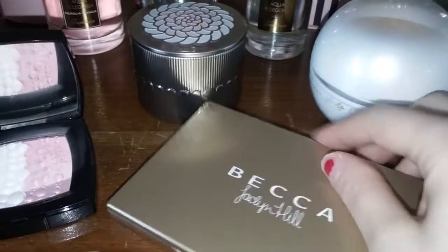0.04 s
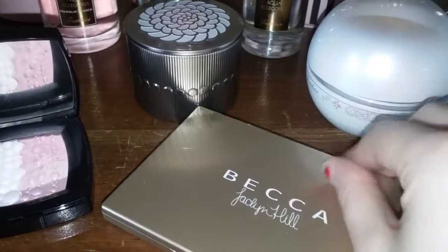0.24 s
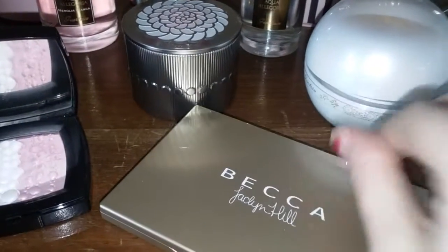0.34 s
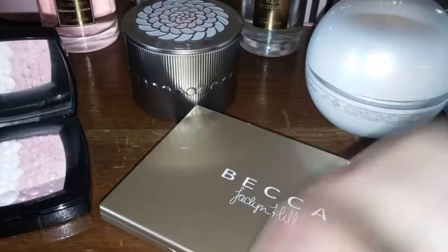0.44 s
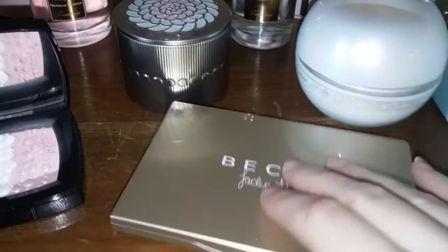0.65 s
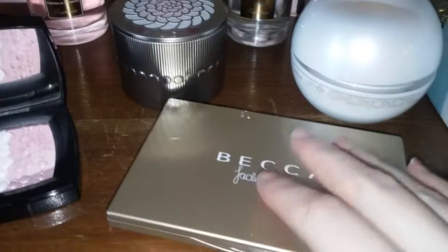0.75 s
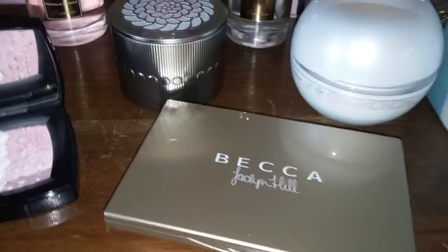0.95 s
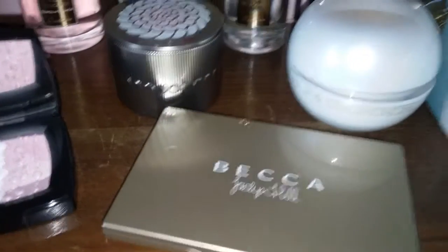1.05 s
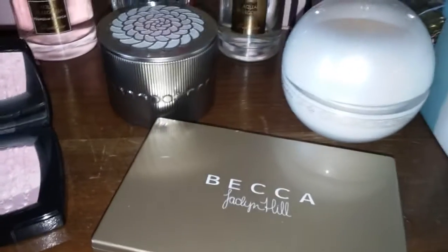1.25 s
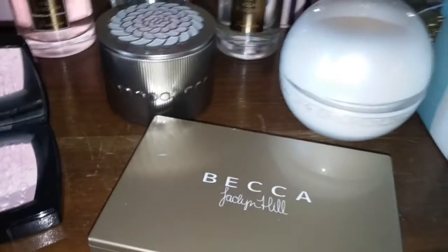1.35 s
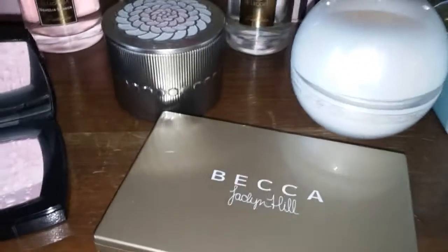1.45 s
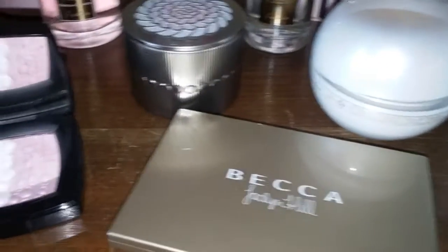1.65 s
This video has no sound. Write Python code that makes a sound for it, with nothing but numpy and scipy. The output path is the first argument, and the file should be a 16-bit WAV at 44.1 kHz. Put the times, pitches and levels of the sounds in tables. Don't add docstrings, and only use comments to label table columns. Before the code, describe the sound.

A plastic compact on a wooden table, heard close in a small quiet room with low rumble, soft hush and hiss. Faint bumps at first, then at 0.24 s a loud hard snap and rapid clatter until about 0.29 s, with short room echo. From 0.57 to 0.76 s, much quieter sliding rub and soft taps. A faint rub near 1.0 s, slight nudges at 1.28 and 1.6 s.

```python
import sys
import numpy as np
from scipy import signal
from scipy.fft import rfft, irfft
from scipy.io import wavfile

SR = 44100
rng = np.random.default_rng(int(sys.argv[2]) if len(sys.argv) > 2 else 0)


def bounce(signal):
    frames = np.transpose(np.atleast_2d(signal))
    limited = np.clip(frames, -1, 1)
    pcm = np.round(limited * 32767).astype(np.int16)
    wavfile.write(sys.argv[1], SR, pcm)


def makeup_ratio(level_db):
    decades = np.asarray(level_db, float) / 20
    return 10 ** decades


N = 74970


def at_hz(spectrum, hz):
    pitch_hz, level_db = np.transpose(spectrum)
    return np.interp(np.log(hz + 1), np.log(pitch_hz), level_db, left=-200, right=-200)


def colour(x, spectrum):
    gain = makeup_ratio(at_hz(spectrum, np.fft.rfftfreq(N, 1 / SR)))
    return irfft(rfft(x) * gain, N)


def bandpass(x, order, edges_hz):
    return signal.sosfilt(signal.butter(order, edges_hz, "band", fs=SR, output="sos"), x)


def rms_one(x):
    return x / np.sqrt(np.mean(x ** 2) + 1e-20)


def drift(rate):
    r = np.exp(-80 * np.pi * rate / SR)
    noise = rng.standard_normal(N // 40 + 2002)
    slow = signal.lfilter([1], [1, -2 * r, r * r], noise)[2000:]
    return np.interp(np.arange(N) / 40, np.arange(len(slow)), rms_one(slow))


def ring(x, hz, t60):
    r = makeup_ratio(-60 / (max(t60, 1e-3) * SR))
    w = 2 * np.pi * hz / SR
    return signal.lfilter([0, np.sin(w)], [1, -2 * r * np.cos(w), r * r], x + 1e-18)


def hush(spectrum, patchy_db, fast):
    hz = np.fft.rfftfreq(N, 1 / SR)
    noise = rfft(rng.standard_normal(N)) * makeup_ratio(at_hz(spectrum, hz))
    together = drift(8.85)
    out = 0
    for centre in 30 * 2 ** np.arange(0, 9.6, .5):
        share = np.clip(1 - abs(2 * np.log2((hz + 1) / centre)), 0, 1)
        flicker = makeup_ratio(patchy_db * (0.241 * together + drift(fast)))
        out = out + irfft(noise * share, N) * flicker
    return rms_one(out)


# pitch_hz [Hz], width_hz [Hz], level_db [dB rms]
ROOM_TONES = [(84.26, 4.7, -60.5), (173.8, 66, -62.5), (233.74, 32, -60.5), (380, 22.5, -64.5),
              (480, 35.2, -68)]
# pitch_hz [Hz], level_db [dB]
RUMBLE_SPECTRUM = [(18, -70.5), (30, -32.5), (81, -1), (119, -10.5), (157, -3), (237, -14.5), (259, -10),
                   (369, -7.5), (1000, -18), (1300, -38.5), (2200, -120)]
# pitch_hz [Hz], level_db [dB]
HUSH_SPECTRUM = [(530, -55.5), (900, -19), (1070, -3), (1140, -4.5), (1230, -4.5), (1890, -0.5),
                 (1980, 1.5), (2650, -16.5), (3600, -31), (4680, -39), (7920, -120)]
# pitch_hz [Hz], level_db [dB]
HISS_SPECTRUM = [(1940, -20), (3300, -6), (3890, 0), (4350, 0.5), (6190, -1), (14600, 0), (15800, 1)]


def quiet_room():
    out = np.zeros(N)
    for pitch_hz, width_hz, level_db in ROOM_TONES:
        level = makeup_ratio(level_db + 1.0 * drift(24.0))
        tone = ring(rng.standard_normal(N + SR), pitch_hz, 4.06 / width_hz)[SR:]
        out += level * rms_one(tone)
    out += makeup_ratio(-49 - 2.5) * hush(RUMBLE_SPECTRUM, patchy_db=1.5, fast=28.8)
    out += makeup_ratio(-51) * hush(HUSH_SPECTRUM, patchy_db=1.6, fast=30.8)
    out += makeup_ratio(-66) * hush(HISS_SPECTRUM, patchy_db=2.04, fast=15.5)
    return out


# start_s [s, at the peak], level_db [dB], pitch_hz [Hz], length_s [s]
BUMPS = [(.015, -37, 137.4, 0.024), (.08, -44.5, 162, 0.0447), (.165, -43, 172.4, 0.0296),
         (.15, -45.5, 279.5, 0.012), (.30, -40, 95.73, 0.0514), (.335, -39.5, 409.2, 0.044),
         (.52, -49, 94.1, 0.16), (.575, -45, 166.5, 0.0395), (.66, -42, 93, 0.0686),
         (.675, -35.5, 480, 0.017), (.68, -41.5, 181.8, 0.069), (.725, -50.5, 86.9, 0.093),
         (.855, -42.5, 191.3, 0.0374), (.91, -42.5, 154.3, 0.0344), (.995, -41.5, 83.7, 0.0272),
         (0.972, -50.5, 380, 0.084), (0.079, -44, 92, 0.039), (0.137, -53, 92.5, 0.055),
         (1.18, -39, 167, 0.0213), (1.28, -46, 92.6, 0.046), (1.35, -49, 92.3, 0.17),
         (1.46, -47.5, 159.6, 0.134), (1.63, -44, 88.6, 0.086)]


def bumps():
    t = np.arange(N) / SR
    out = np.zeros(N)
    for start_s, level_db, pitch_hz, length_s in BUMPS:
        swell = np.exp(-(2.67 * (t - start_s) / length_s) ** 2)
        out += makeup_ratio(level_db) * swell * np.sin(2 * np.pi * pitch_hz * (t - start_s))
    return out


def clicks(start_s, level_db):
    out = np.zeros(N)
    out[(start_s * SR).astype(int)] = makeup_ratio(level_db)
    return out


def struck(start_s, level_db, modes, shape, spread_db):
    t = np.arange(len(shape)) / SR
    chance = rng.standard_normal((len(level_db), len(modes)))
    out = 0
    for k, (pitch_hz, mode_db, t60_s) in enumerate(modes):
        mode = shape * makeup_ratio(-60 * t / t60_s) * np.sin(2 * np.pi * pitch_hz * t)
        hits = clicks(start_s, level_db + mode_db + spread_db * chance[:, k])
        out = out + signal.fftconvolve(hits, mode)[:N]
    return out


def tail(x, db, t60):
    gap_s = 0.00426
    t = np.arange(SR // 2) / SR
    decay = rng.standard_normal(len(t)) * makeup_ratio(db - 60 * t / t60) * np.clip(t / gap_s - 1, 0, 1)
    return signal.fftconvolve(x, decay)[:N]


# pitch_hz [Hz], level_db [dB], t60_s [s]
PLATE_HIGH = [(2007, 3, 0.0379), (1845, -2.5, 0.0285), (2269, -8.5, 0.038), (2840, -35.5, 0.0095)]
# pitch_hz [Hz], level_db [dB], t60_s [s]
PLATE_LOW = [(1392.3, 1.5, 0.0567), (1203.5, -8.5, 0.0387), (1074, -13.5, 0.0136)]


def plates(start_s, level_db, low_db):
    rise_s, free_s, damp_s, left_db = .0007, .0032, .00022, -19
    t = np.arange(SR // 4) / SR
    free = 1 / (1 + np.exp(np.clip((t - free_s) / damp_s, -50, 50)))
    damped = (1 - np.exp(-t / rise_s)) * (makeup_ratio(left_db) + (1 - makeup_ratio(left_db)) * free)
    high = struck(start_s, level_db, PLATE_HIGH, damped, spread_db=.7)
    low = struck(start_s, level_db + low_db, PLATE_LOW, damped, spread_db=.7)
    return bandpass(high - low, 3, [900, 3200])


# pitch_hz [Hz], level_db [dB], t60_s [s]
EDGE = [(3710, 16, 0.00233), (5178, 9.5, 0.021), (6060, -3.5, 0.0064), (7160, -3, 0.0026),
        (8060, -5.5, 0.007), (9813, 4, 0.012), (11470, -6, 0.0036), (14200, -13, 0.0027)]


def edge_crack(start_s, crack_db):
    burst_db, burst_t60_s, lag_s, dull_hz = 3.5, 0.01046, .0004, 10240
    t = np.arange(SR // 4) / SR
    burst = makeup_ratio(burst_db - 60 * t / burst_t60_s)
    crack = struck(start_s, crack_db - 13, EDGE, np.ones(len(t)), spread_db=2.0)
    crack = crack + rng.standard_normal(N) * signal.fftconvolve(clicks(start_s, crack_db), burst)[:N]
    crack = signal.sosfilt(signal.butter(3, 2800, "high", fs=SR, output="sos"), crack)
    crack = signal.lfilter(*signal.butter(1, dull_hz, fs=SR), crack)
    return np.roll(crack, int(lag_s * SR))


# pitch_hz [Hz], level_db [dB], t60_s [s]
TABLE = [(480, 4.5, 0.0269), (389.3, 3.5, 0.0234), (241.6, -5, 0.0525), (182.4, -17.5, 0.0765),
         (92, -20.5, 0.065), (738.7, -0.5, 0.02866), (862.8, -1, 0.02074)]


def table_thud(start_s, thud_db):
    rise_s = 0.000847
    t = np.arange(SR // 4) / SR
    return struck(start_s, thud_db, TABLE, 1 - np.exp(-t / rise_s), spread_db=2.5)


# start_s [s], level_db [dB], low_plate_db [dB], edge_db [dB], thud_db [dB]
CONTACTS = [(0.2427, -6, -14.5, -34.5, -21), (0.253, -31, -1, -31.5, -10.5),
            (.2614, -11.5, -1.5, -10.5, -25), (.2634, -10, -9.5, -15, -33.5),
            (0.2684, -24, -12.5, -15.5, -3), (0.2716, -0.5, -5, -24.5, -23.5), (.2753, -7, -28, -34.5, -20),
            (.2800, -31.5, 18, -29, -11), (.2860, -23.5, 1.5, -31, -8), (.5844, -34, 0, -15, -5),
            (.5870, -37, 10, -36, -9.5), (.6452, -39.5, 3, -19, -5), (0.658, -41.5, 8, -27, -5),
            (0.6685, -30, -2.5, -24.5, -5), (0.6719, -43.5, -1.5, -27, 1), (0.685, -46, 0.5, -26, 1),
            (.7136, -27, 1.5, -18.5, -6.5), (.7165, -33.5, -21.5, -29.5, -20.5),
            (0.7242, -30, -3.5, -32, -22)]
# start_s [s], level_db [dB], low_plate_db [dB], edge_db [dB], thud_db [dB]
NUDGES = [
    (.7737, -54, 6, -29.5, -4),
    (0.8439, -44.5, -18.5, -29.5, 4.5),
    (0.9816, -44, 0, -26, -2.5),
    (1.2752, -42, -5, -23, -10),
    (0.015, -46.5, 4, -30.5, 3),
    (.1530, -49.5, 4.5, -30, 5.5),
    (.9500, -51, 4.5, -30, 4),
    (1.6043, -52, 6.5, -30, -7),
]
# pitch_hz [Hz], level_db [dB]
BRIGHT_TAIL = [(2600, 2.5), (3300, 2), (5000, 7), (7000, 3), (10000, -1), (15500, -15.5)]


def compact():
    start_s, level_db, low_db, edge_db, thud_db = np.transpose(CONTACTS + NUDGES)
    plate = plates(start_s, level_db, low_db)
    crack = edge_crack(start_s, level_db + edge_db)
    knock = table_thud(start_s, level_db + thud_db)
    wide = bandpass(clicks(start_s, level_db), 4, [1150, 2400])
    plate_tail = tail(plate + 2.0 * wide, -42, 0.1933)
    knock_tail = tail(knock, -34, 0.211)
    bright_tail = colour(tail(clicks(start_s, level_db + edge_db), -16.5, 0.175), BRIGHT_TAIL)
    return plate + plate_tail + knock + knock_tail + crack + bright_tail


def rubbed(grains, modes):
    out = 0
    for k, (pitch_hz, level_db, t60_s) in enumerate(modes):
        out = out + makeup_ratio(level_db / 2) * ring(grains, pitch_hz, t60_s / 2) * (-1) ** k
    return rms_one(out)


# start_s [s], level_db [dB]
SLIDE = [
    (.57, -60.5),
    (.615, -50.5),
    (.64, -46),
    (.67, -40.5),
    (.70, -46),
    (.735, -52),
    (.76, -63),
    (.96, -57),
    (1.0, -48),
    (1.05, -67),
]
# pitch_hz [Hz], level_db [dB]
SKIN = [(3000, -4), (5000, -8.5), (8500, -2.5), (11000, -4), (15500, -11)]


def slide():
    grains_per_s = 1800
    start_s, level_db = np.transpose(SLIDE)
    slips = rng.random((3, N)) < grains_per_s / SR
    strength = makeup_ratio(5.4 * np.minimum(rng.exponential(1, (3, N)), 5))
    grains = slips * strength * rng.choice([-1, 1], (3, N))
    body = rubbed(grains[0], PLATE_HIGH + PLATE_LOW)
    body = signal.sosfilt(signal.butter(4, 2600, fs=SR, output="sos"), body)
    low = rubbed(grains[1], TABLE)
    hiss = rms_one(colour(rng.standard_normal(N) + 0.63 * rms_one(grains[2]), SKIN))
    pressure = makeup_ratio(np.interp(np.arange(N) / SR, start_s, level_db) + 3.4 * drift(40))
    return pressure * (body + makeup_ratio(-15.5) * hiss + makeup_ratio(-6) * low)


def scene():
    return (compact() + slide() + bumps() + quiet_room())[None]


def band_limit(x):
    return signal.sosfilt(signal.butter(12, 16820, fs=SR, output="sos"), x)


def record(dry):
    x = signal.sosfilt(signal.butter(3, 66.6, "high", fs=SR, output="sos"), dry)
    x = x / (1 + abs(x) ** 4) ** .25
    x = signal.sosfilt(signal.cheby2(12, 70, 16000 * 1.08, fs=SR, output="sos"), x)
    return band_limit(x)


dry = scene()
out = record(dry)
bounce(out)
```